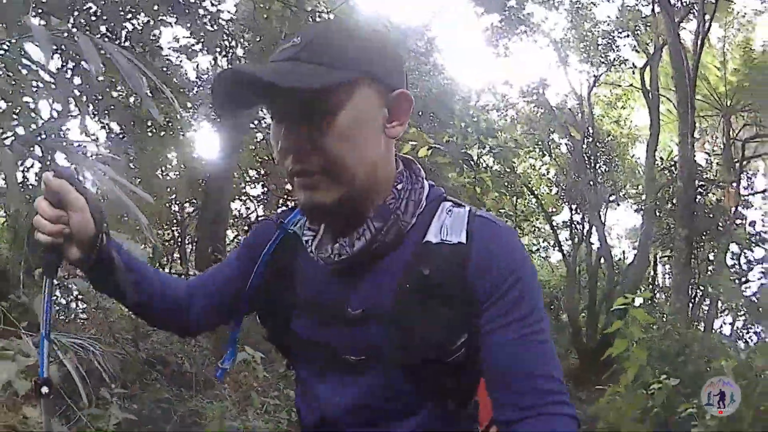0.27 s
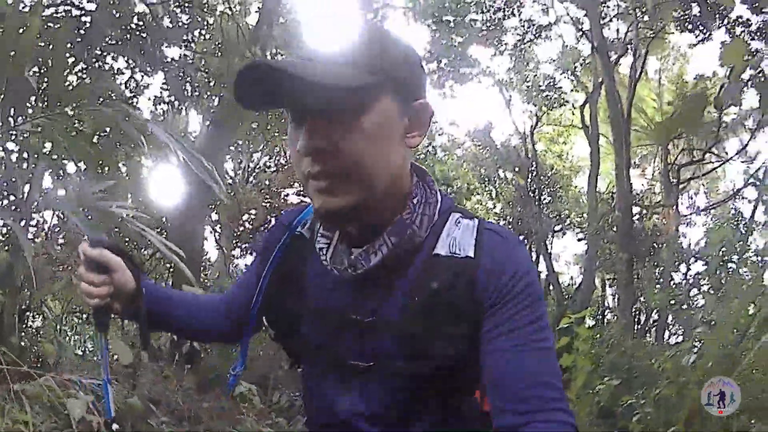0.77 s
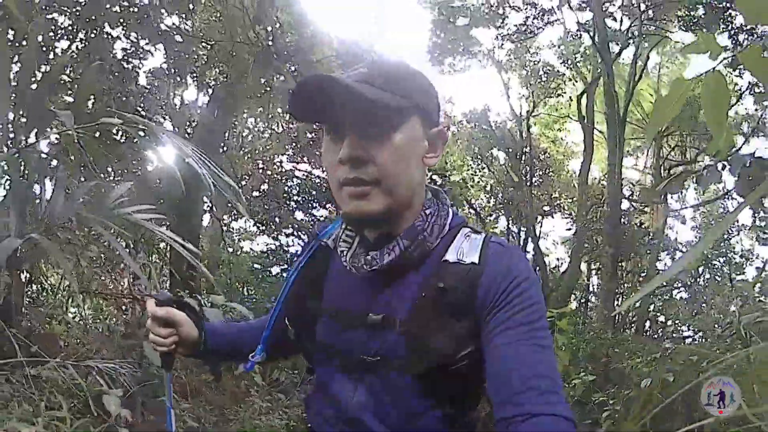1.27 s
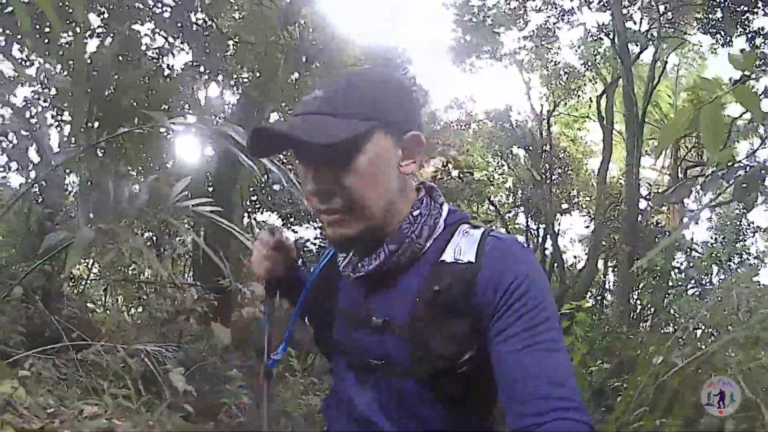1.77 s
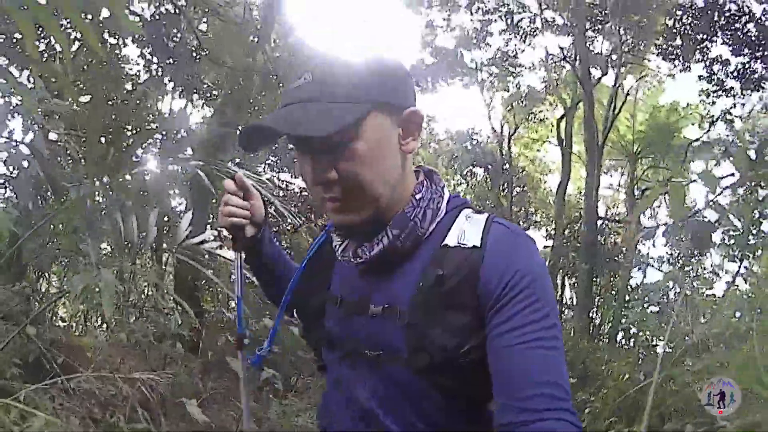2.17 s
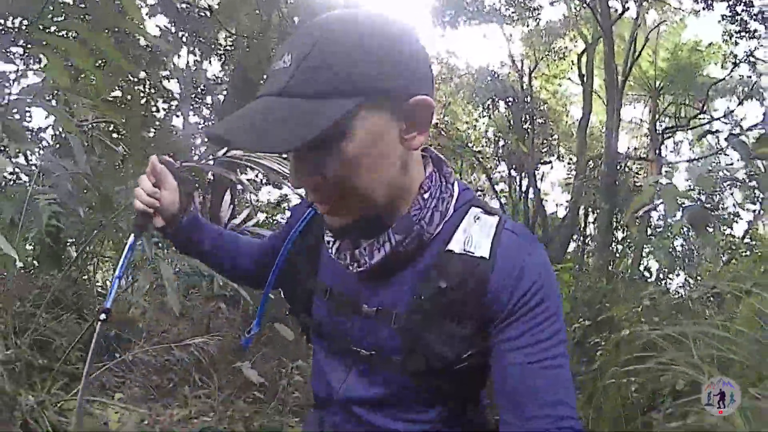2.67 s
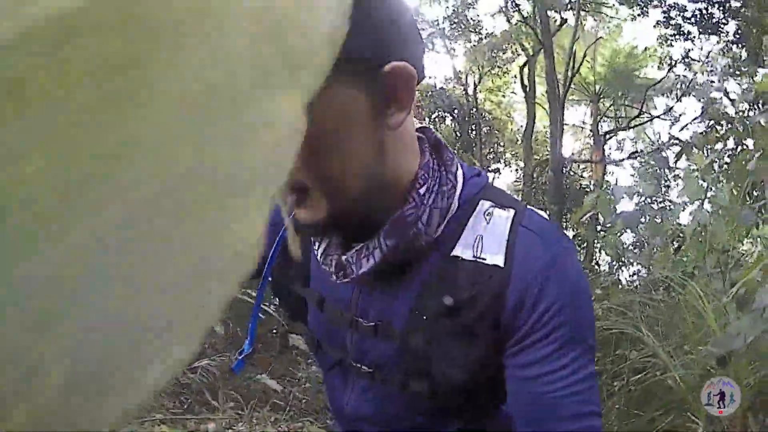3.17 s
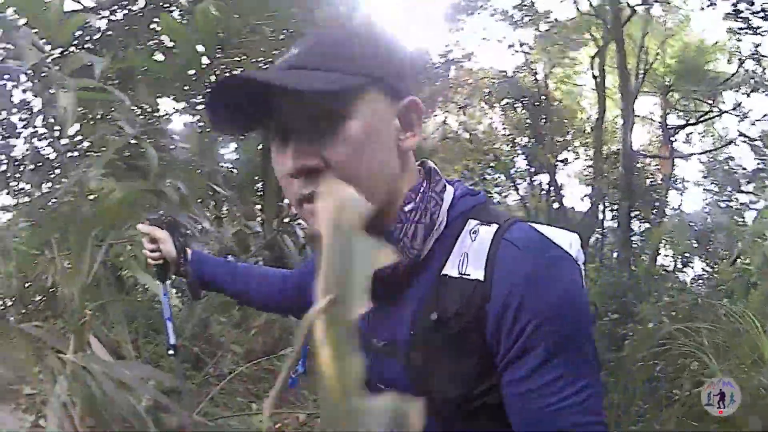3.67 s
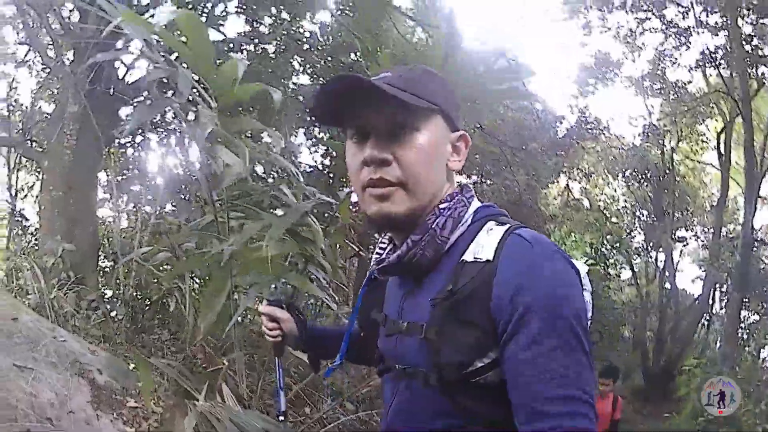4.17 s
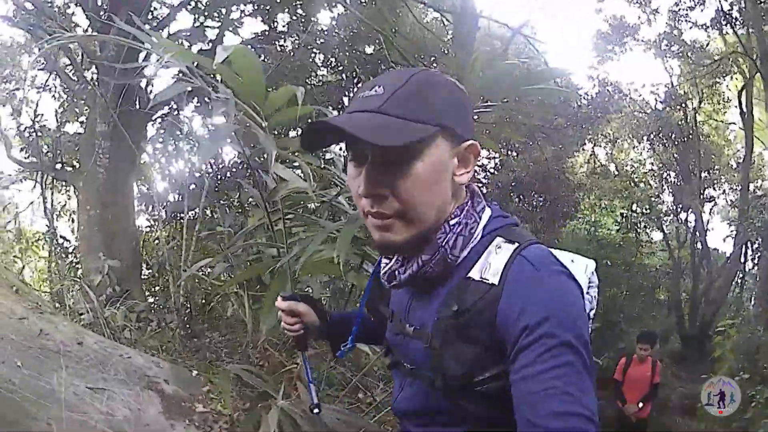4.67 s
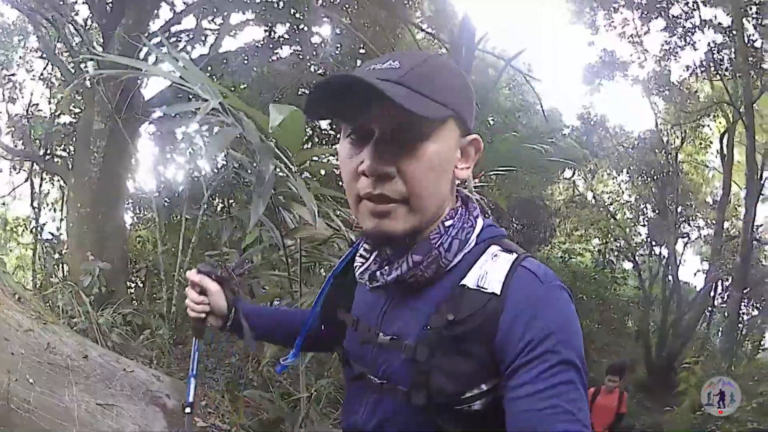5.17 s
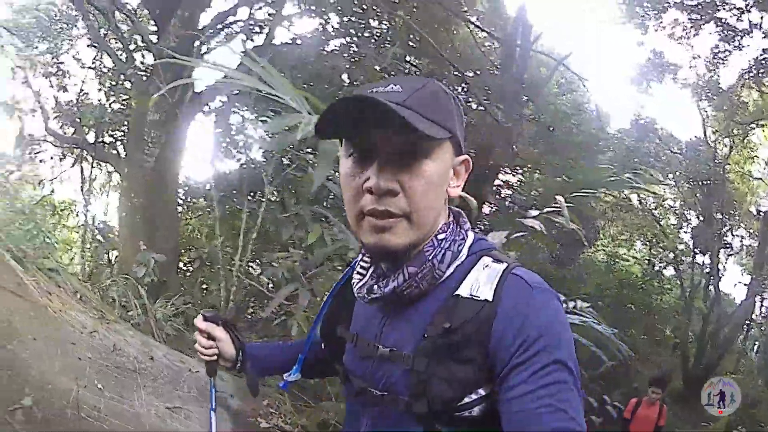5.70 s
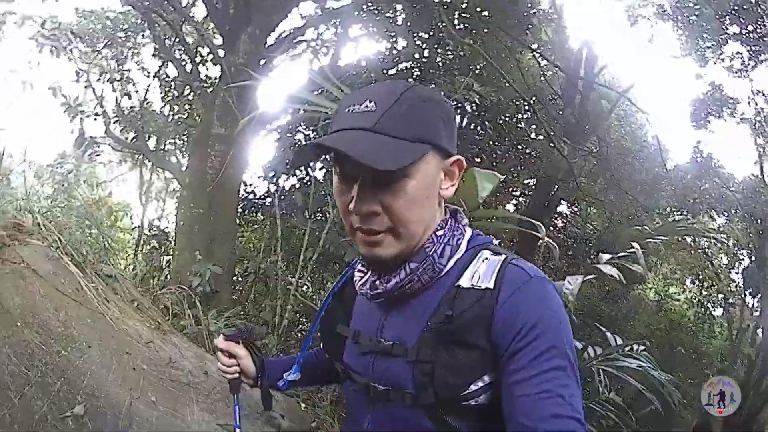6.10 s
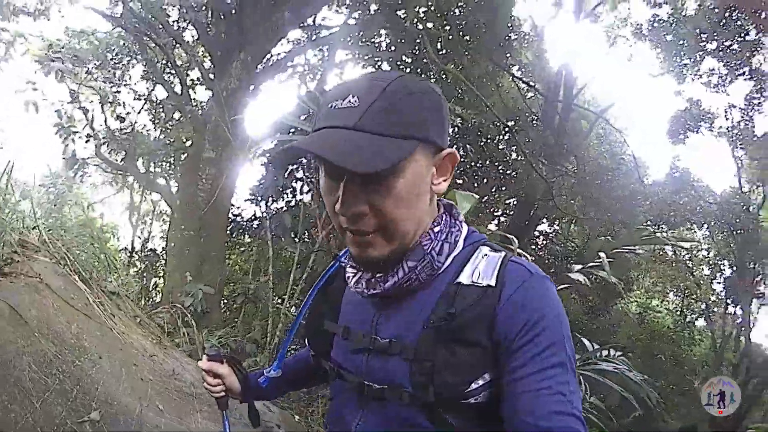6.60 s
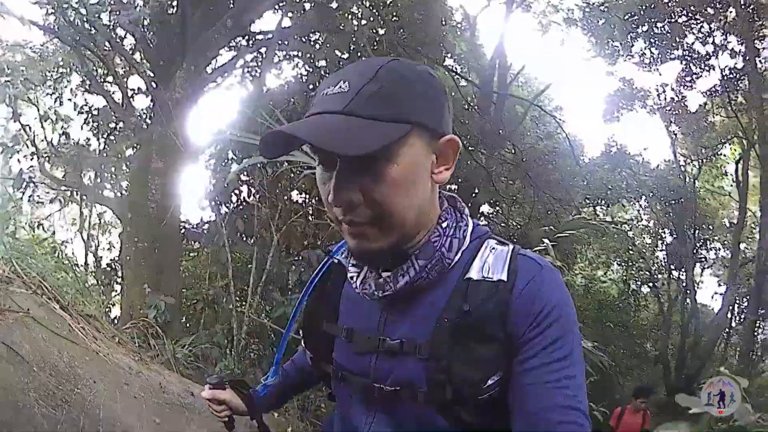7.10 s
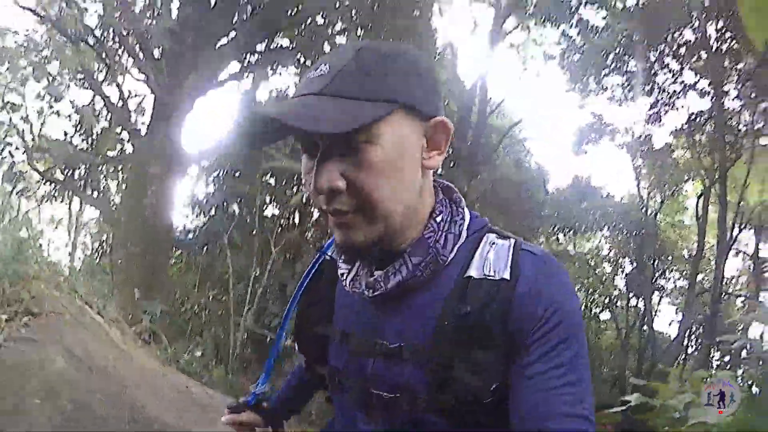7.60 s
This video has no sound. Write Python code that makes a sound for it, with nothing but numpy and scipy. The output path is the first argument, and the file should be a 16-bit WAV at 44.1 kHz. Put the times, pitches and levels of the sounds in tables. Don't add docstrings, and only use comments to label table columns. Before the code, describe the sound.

Outdoors on a wooded trail, heard through a cheap handheld camera microphone: faint air and hum, soft steps, brittle twig snaps and a brief leaf swish. Foliage suddenly batters and scrapes the housing, very close and loud, with bumps underneath. It eases, then brushes and crackles again more briefly. Afterwards only light scuffs and small snaps remain while a far engine climbs in pitch.

```python
import sys
import numpy as np
from scipy import signal
from scipy.fft import rfft, irfft
from scipy.io import wavfile
from scipy.ndimage import uniform_filter1d

SR = 44100
rng = np.random.default_rng(int(sys.argv[2]) if len(sys.argv) > 2 else 0)


def gain_from_db(level_db):
    decades = np.asarray(level_db, float) / 20
    return 10 ** decades


def inscribe(sig):
    pcm = np.round(np.clip(np.atleast_2d(sig).T, -1, 1) * 32767)
    wavfile.write(sys.argv[1], SR, pcm.astype(np.int16))


N = 346080


def rms_one(x):
    return x / np.sqrt(np.mean(x ** 2) + 1e-20)


def in_time(rows):
    s, *columns = np.transpose(rows)
    return [np.interp(np.arange(N) / SR, s, c) for c in columns]


def drift(rate_hz):
    r = np.exp(-2 * np.pi * rate_hz / SR)
    slow = signal.lfilter([1], [1, -2 * r, r * r], rng.standard_normal(N + SR))[SR:]
    return rms_one(slow - slow.mean())


def band(x, low_hz, high_hz):
    return signal.sosfilt(signal.butter(2, [low_hz, high_hz], "band", fs=SR, output="sos"), x)


def resonance(x, hz, width_hz):
    r = np.exp(-np.pi * width_hz / SR)
    gain = (1 - r * r) / 2
    return signal.lfilter([gain, 0, -gain], [1, -2 * r * np.cos(2 * np.pi * hz / SR), r * r], x)


def grains(per_s, spread_db, clump_db, clump_hz):
    sizes = gain_from_db(spread_db * np.minimum(rng.exponential(1, N), 4)) * rng.choice([-1, 1], N)
    happens = rng.random(N) < per_s / SR
    slips = gain_from_db(clump_db * drift(clump_hz)) * sizes * happens + 1e-9
    return slips / np.sqrt(uniform_filter1d(slips ** 2, size=SR // 8))


# [f/Hz, bandwidth/Hz, level/dB]
LEAF_MODES = [
    (868, 270, -0.5),
    (1100, 61, -3),
    (1500, 390, 0.5),
    (1760, 310, -7.5),
    (2475, 220, -4.5),
]


def drag():
    rustle_db, grit_db, rub_db, rumble_db = contact()
    near = np.clip((rustle_db + 58) / 25, .1, 1)
    slips = grains(5000 - 3000 * near, spread_db=3.0 * near, clump_db=6.0 * near, clump_hz=70)
    dealt = rng.integers(0, len(LEAF_MODES), N)
    rustle = np.zeros(N)
    for k, (hz, width_hz, db) in enumerate(LEAF_MODES):
        patchy = gain_from_db(db + 4.0 * drift(25.0))
        rustle += patchy * resonance(slips * (dealt == k), hz, width_hz)
    sand = band(slips, 2300, 4900)
    grit = band(slips, 3700, 9600) + gain_from_db(-30) * sand
    rub = band(slips + 0.64 * rng.standard_normal(N), 110, 738)
    rumble = band(rng.standard_normal(N), 3, 70) * gain_from_db(2.5 * drift(42.0))
    bright = rms_one(rustle) + gain_from_db(grit_db + 19.0) * rms_one(grit)
    low = gain_from_db(rub_db) * rms_one(rub) + gain_from_db(rumble_db + 1.5) * rms_one(rumble)
    return gain_from_db(rustle_db) * bright + low


# [start t/s, hold t/s, rustle level/dB, weight on the housing over rustle level/dB]
STROKES = [(0.496, 0.26, -61.5, -2), (0.804, .07, -60.5, -4), (0.897, 0.17, -57, 2), (1.39, 0.15, -67, -11),
           (1.558, 0.28, -55, -4), (1.657, .28, -52, -1), (2.503, 0.23, -67.5, 8.5),
           (2.867, 0.14, -49, 8.5), (2.938, 0.14, -52.5, 21.5), (3.001, 0.066, -45.5, 21.5),
           (3.085, .02, -55, 10), (3.107, 0.17, -46.5, 9), (3.218, 0.11, -34, 10), (3.296, 0.11, -36.5, -2),
           (3.375, 0.094, -37.5, 6), (3.463, 0.14, -29.5, 0), (3.629, 0.094, -41, -2),
           (3.694, 0.18, -43, -2), (3.904, .08, -44.5, 0), (4.006, 0.025, -43.5, 8.5),
           (4.064, .06, -50, 10.5), (4.15, 0.055, -58, 5.5), (4.548, 0.18, -61.5, 9.5),
           (4.64, 0.51, -54, 4), (4.841, 0.022, -42, 0), (4.87, .12, -43, 0.5), (4.99, 0.12, -43, 0),
           (5.126, 0.063, -53, 19.5), (5.197, 0.056, -48.5, 2.5), (5.321, 0.014, -54.5, 0)]
# [t/s, rustle level/dB]
SCUFFING = [(0, -91.5), (.44, -66.5), (1.16, -70), (1.57, -66.5), (2.03, -65), (2.29, -75), (2.6, -64.5),
            (2.84, -70.5), (4.25, -64.5), (4.52, -79.5), (5.29, -59.5), (5.57, -78.5), (6.4, -73.5),
            (7.0, -75.5), (7.41, -70.5), (7.85, -71.5)]


def contact():
    t, (far_db,) = np.arange(N) / SR, in_time(SCUFFING)
    sway_db = .3 * (far_db - far_db.mean())
    power = gain_from_db([far_db, far_db - 13.5, -68 + sway_db, -61 + sway_db]) ** 2
    release_s = 0.03
    for s, hold, db, weight_db in STROKES:
        at = slice(round(s * SR), round((s + hold + .3) * SR))
        u = t[at] - s
        attack_s = 0.011 + 0.21 * hold
        shape = np.clip(u / attack_s, 0, 1) * np.exp(-np.maximum(u - hold, 0) / release_s)
        layers_db = np.array([0, -12.5 + .3 * weight_db, -5.5 + weight_db, -3 + .8 * weight_db])
        power[:, at] += (gain_from_db(db + layers_db)[:, None] * shape) ** 2
    rustle_db, grit_db, rub_db, rumble_db = 10 * np.log10(power)
    return rustle_db, grit_db - rustle_db, rub_db, rumble_db


def fractures(rows):
    out, t = np.zeros(N + SR), np.arange(SR // 10) / SR
    for s, db, hz, t60, crack_db in rows:
        t60 = min(t60, .032)
        swell = (1 - np.exp(-t / (.085 * t60))) ** 2
        tear = rng.standard_normal(len(t)) * gain_from_db(-60 * t / t60) * swell
        spill = band(tear, .5 * hz, 1100 + hz)
        ring = resonance(resonance(tear, hz, .5 * hz), hz, .35 * hz) + 0.33 * spill
        crack = band(tear * gain_from_db(-70 * t / t60), 1900, 4300)
        at = round((s - .0012 - .01 * t60) * SR)
        snap = ring / abs(ring).max() + gain_from_db(crack_db) * crack / abs(crack).max()
        out[at:at + len(t)] += gain_from_db(db + 1.0) * snap
    return out[:N]


# [t/s, peak level/dB, ring f/Hz, ring t60/s]
CREASES = [(2.912, -27, 1680, .06), (2.967, -23.5, 2370, 0.058), (2.993, -21.5, 1240, 0.045),
           (3.014, -14.5, 680, 0.025), (3.02, -18.5, 590, 0.13), (3.027, -14, 907, 0.013),
           (3.036, -10.5, 950, 0.012), (3.073, -27.5, 750, 0.017), (3.111, -32.5, 665, 0.041),
           (3.172, -34.5, 970, 0.017), (3.216, -27.5, 745, 0.039), (3.234, -24, 726, 0.075),
           (3.256, -15, 925, 0.028), (3.288, -23.5, 910, 0.061), (3.343, -21.5, 600, 0.012),
           (3.434, -37.5, 1100, 0.024), (3.472, -24.5, 1570, 0.07), (3.489, -18, 970, 0.032),
           (3.51, -18, 970, 0.048), (3.589, -18.5, 950, 0.041), (3.678, -32, 1110, 0.08),
           (3.703, -15.5, 980, 0.025), (3.756, -28, 1100, 0.0094), (3.769, -20.5, 916, .042),
           (3.8, -19, 1400, 0.019), (3.951, -24, 1450, .026), (3.997, -35, 1500, 0.052),
           (4.018, -29.5, 1580, 0.048), (4.033, -26, 870, 0.012), (4.122, -27.5, 1400, 0.02)]


def creases():
    return fractures([(*row, -45) for row in CREASES])


# [t/s, peak level/dB, ring f/Hz, ring t60/s]
CRUNCHES = [(.347, -61, 620, 0.0076), (0.645, -37, 1490, .034), (.902, -64, 678, 0.0089),
            (.972, -48.5, 955, 0.039), (1.048, -53, 920, 0.098), (1.623, -46, 1270, 0.0067),
            (2.546, -42.5, 755, .045), (4.58, -45, 1160, 0.018), (4.599, -43, 1220, 0.043),
            (4.664, -37.5, 1150, 0.074), (4.675, -33.5, 1160, 0.019), (4.745, -33.5, 1480, 0.0092),
            (4.775, -43, 1420, 0.025), (4.799, -26, 1610, 0.027), (4.958, -32, 1570, 0.024),
            (4.993, -24, 1440, 0.07), (5.038, -25, 1010, 0.042), (5.08, -23.5, 1280, 0.0087),
            (5.087, -24.5, 1470, 0.04), (5.103, -26, 1310, .019), (5.148, -19.5, 1290, .023),
            (5.164, -27, 1310, 0.039), (5.201, -25, 1230, 0.08), (5.464, -56.5, 830, 0.045),
            (6.026, -58.5, 611, .025), (6.144, -55.5, 635, 0.026), (6.224, -56, 926, 0.032),
            (6.721, -52, 883, .053), (7.54, -48, 1470, 0.021), (7.561, -48.5, 1230, 0.047)]


def crunches():
    return fractures([(*row, -37) for row in CRUNCHES])


# [t/s, peak level/dB, ring f/Hz, crack over ring level/dB]
TWIGS = [(0.079, -73.5, 750, 18), (.508, -43, 1290, -24), (0.587, -37.5, 1285, 3), (0.824, -47.5, 1760, -8),
         (.934, -41.5, 970, 0), (.995, -54, 920, -3), (1.394, -54, 940, -15), (1.579, -46.5, 990, 0.5),
         (1.86, -44, 2080, 7), (1.896, -38, 1960, 2), (2.687, -39, 1110, -2), (2.874, -41, 1650, -3.5),
         (2.896, -15, 1700, -5), (2.946, -19, 1500, -1.5), (3.329, -17.5, 1000, -45),
         (3.364, -25, 832, -11), (3.393, -23.5, 800, 1), (3.545, -24, 1400, -15.5),
         (3.564, -23.5, 1210, -15.5), (4.08, -37.5, 657, 5), (4.842, -13, 1600, 2), (4.921, -44, 1510, 1),
         (5.182, -20.5, 1130, 2.5), (5.251, -36, 1840, -14), (5.337, -48, 860, 8.5),
         (5.867, -54, 2200, -12), (7.242, -58, 1500, 2), (7.326, -48, 765, -36), (7.623, -41, 1330, 4),
         (7.715, -52.5, 923, 6)]


def twigs():
    t60_s = 0.023
    return fractures([(s, db, hz, t60_s, crack_db) for s, db, hz, crack_db in TWIGS])


# [t/s, peak level/dB, ring f/Hz, t60/s]
THUDS = [(0.184, -42, 147, 0.065), (0.345, -39, 205, 0.054), (0.903, -30.5, 180, 0.095),
         (1.244, -48, 73, 0.081), (1.416, -43, 78.4, 0.06), (1.624, -37, 78, 0.19),
         (2.515, -36.5, 101, 0.039), (2.953, -26.5, 71.6, 0.05), (3.015, -18, 287, 0.09),
         (3.254, -18.5, 150, 0.053), (3.326, -19, 149, 0.11), (3.997, -32.5, 229, 0.15),
         (4.095, -21, 72, 0.041), (4.122, -26, 88, 0.12), (4.567, -37, 202, 0.12), (5.029, -25, 108, 0.04),
         (5.18, -21, 78, 0.057), (5.328, -40.5, 205, 0.095), (6.683, -41.5, 121, 0.093),
         (6.719, -41, 194, 0.094), (7.324, -45, 101.3, 0.11)]


def thuds():
    out, t = np.zeros(N + SR), np.arange(SR // 4) / SR
    for s, db, hz, t60 in THUDS:
        sag = 1 + 0.57 * np.exp(-t / 0.0089)
        swing = np.sin(2 * np.pi * hz * t * sag) * gain_from_db(-60 * t / t60) * np.minimum(t / 0.0016, 1)
        knock = band(rng.standard_normal(len(t)) * gain_from_db(-60 * t / 0.067), 110, 580)
        at = round(s * SR)
        out[at:at + len(t)] += gain_from_db(db - 3.5) * (swing + 0.68 * knock / abs(knock).max())
    return out[:N]


# [t/s, level/dB, length t/s, body f/Hz, sizzle over body level/dB]
SWISHES = [(1.692, -40, 0.075, 2100, 8), (1.73, -50, 0.043, 1200, -7), (1.787, -41.5, 0.058, 1400, 7),
           (1.846, -39.5, 0.038, 2070, 9.5), (1.906, -45, 0.019, 2300, 8.5),
           (1.922, -55.5, 0.029, 1380, 9.5), (1.755, -55, 0.056, 1400, 9), (6.191, -77, 0.066, 420, -12),
           (6.74, -62.5, 0.28, 520, -27), (0.89, -64, 0.19, 1000, 4), (.82, -60, 0.063, 2300, -2),
           (6.1, -66, 0.19, 240, -22), (7.252, -67, .04, 1800, -10), (5.52, -65, 0.071, 860, -14),
           (5.798, -71, 0.048, 2800, -6), (6.28, -63.5, 0.082, 2570, -16), (0.57, -51, 0.044, 1400, -9)]


def swishes():
    out = np.zeros(N)
    fine = grains(6000, spread_db=0.5, clump_db=-2.0, clump_hz=150)
    for s, db, length, hz, sizzle_db in SWISHES:
        at, size = round(s * SR), round(length * SR)
        bit = fine[at:at + size]
        body, sizzle = resonance(bit, hz, 0.6 * hz), band(bit, 3270, 6440)
        swish = rms_one(body) + gain_from_db(sizzle_db) * rms_one(sizzle)
        out[at:at + size] += gain_from_db(db) * np.hanning(size) ** 0.51 * swish
    return out


# [t/s, level/dB]
IDLE = [
    (0, -75),
    (1.0, -57),
    (1.5, -86),
    (1.8, -58),
    (2.5, -71),
    (4.3, -63.5),
    (5.5, -60),
    (5.65, -90),
    (7.85, -97),
]
# [t/s, firing f/Hz, order 1 level/dB, order 2 level/dB, order 3 level/dB]
REV = [
    (5.6, 77.0, -67, -70, -83),
    (5.93, 82.25, -64, -79, -74),
    (6.86, 103.6, -63, -70, -80),
    (7.46, 107.7, -67, -67, -71),
    (7.85, 96.3, -56, -81, -72.5),
]


def engine():
    t = np.arange(N) / SR
    idle_hz = 143.8
    idle_level = gain_from_db(in_time(IDLE)[0] + 1.5 + 2.5 * drift(10.0))
    idle = idle_level * np.sin(2 * np.pi * idle_hz * t + 1.2 * drift(3.0))
    hz, *orders_db = in_time(REV)
    phase = np.cumsum(hz * (1 + 0.029 * drift(8.5))) * 2 * np.pi / SR
    rev = np.zeros(N)
    for k, db in enumerate(orders_db, 1):
        rev += gain_from_db(db + 4.0 + 1.7 * drift(7.0)) * np.sin(k * phase + k * k)
    return idle + rev * np.clip((t - REV[0][0]) / 0.12, 0, 1)


# [f/Hz, level/dB]
FOREST = [(12, -28), (20, 7.5), (90, 4), (243, -14), (414, -9.5), (673, -52.5), (878, -20), (1490, -21),
          (1950, -30.5), (2770, -20), (3950, -33), (5140, -86), (8690, -120)]


def forest():
    hz, db = np.transpose(FOREST)
    f = np.maximum(np.arange(N // 2 + 1) * SR / N, 10)
    shape = gain_from_db(np.interp(np.log(f), np.log(hz), db))
    noise = irfft(rfft(rng.standard_normal(N)) * shape, N)
    return gain_from_db(-62.5 + drift(1.8)) * rms_one(noise)


def scene():
    leaves = drag() + creases() + crunches()
    return (leaves + twigs() + thuds() + swishes() + engine() + forest())[None]


CAMERA_SR = 8000
# [t/s, length t/s, lowest lost f/Hz]
STARVED = [(.432, .052, 2740), (.609, .021, 3570), (.801, .023, 3280), (.897, .021, 3260), (.92, .12, 3880),
           (1.358, .03, 3600), (1.46, .03, 3600), (2.03, .07, 3550), (2.511, .023, 3580),
           (2.609, .052, 3430), (2.83, .038, 3620), (3.074, .038, 2460), (3.125, .035, 3420),
           (3.23, .085, 3750), (3.358, .023, 3100), (3.857, .065, 3200), (3.92, .06, 3750),
           (4.121, .02, 3430), (4.15, .1, 3700), (4.528, .023, 2300), (4.864, .038, 3270),
           (5.01, .065, 3650), (5.119, .012, 2600), (5.23, .075, 3300), (5.364, .05, 3520),
           (7.477, .04, 3300), (7.651, .029, 2410), (7.68, .018, 2630)]


def camera_thinning(x, step_db, slope_db):
    size, overlap = 160, 120
    f, t, cells = signal.stft(x, CAMERA_SR, nperseg=size, noverlap=overlap)
    f, power = f[:, None], abs(cells) ** 2
    smooth = uniform_filter1d(power, size=9, axis=0)
    around = np.exp(uniform_filter1d(np.log(smooth), size=25, axis=1))
    steps = np.kron(rng.standard_normal((14, len(t) // 5 + 1)), np.ones((6, 5)))[:len(f), :len(t)]
    hunger_db = step_db + slope_db * (f / 4000 - 1) + 3.0 * (f > 3900) + 5.5 * steps
    for s, length, hz in STARVED:
        edge = hz + (4000 - hz) * .6 * (2 * (t - s) / length - 1) ** 2
        hunger_db = np.where((t >= s) & (t <= s + length) & (f > edge), 11, hunger_db)
    kept = uniform_filter1d(power, size=3, axis=1) > around * gain_from_db(2 * hunger_db)
    return signal.istft(cells * kept, CAMERA_SR, nperseg=size, noverlap=overlap)[1][:len(x)]


def roll_off(x):
    return signal.sosfilt(signal.butter(12, 16490, fs=SR, output="sos"), x)


def record(dry):
    t = np.arange(N) / SR
    coarse_t = np.arange(int(t[-1] * CAMERA_SR) + 2) / CAMERA_SR
    smooth = signal.sosfilt(signal.cheby2(12, 40, 4250, fs=SR, output="sos"), dry[0])
    coarse = camera_thinning(np.interp(coarse_t, t, smooth), step_db=-3.5, slope_db=22.0)
    mirrored = np.interp(t, coarse_t, coarse)
    fine = signal.sosfilt(signal.cheby2(10, 50, 16800, fs=SR, output="sos"), mirrored)
    return roll_off(fine[None])


dry = scene()
out = record(dry)
inscribe(out)
```